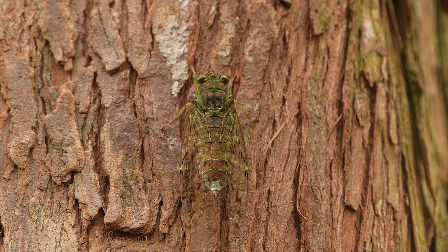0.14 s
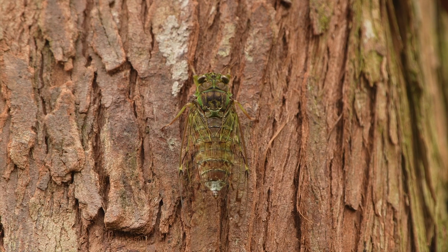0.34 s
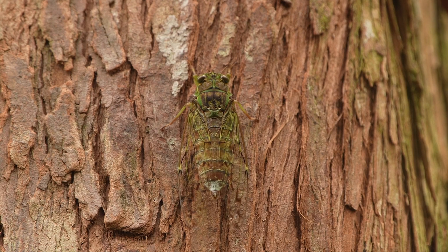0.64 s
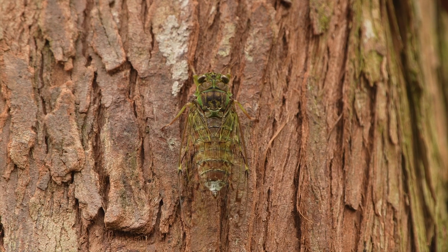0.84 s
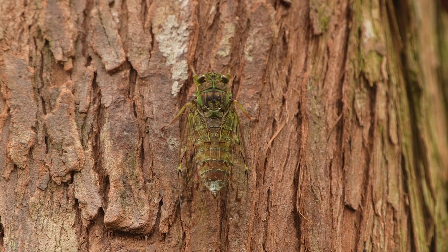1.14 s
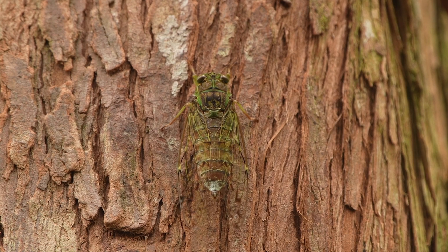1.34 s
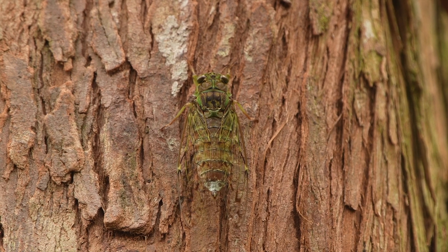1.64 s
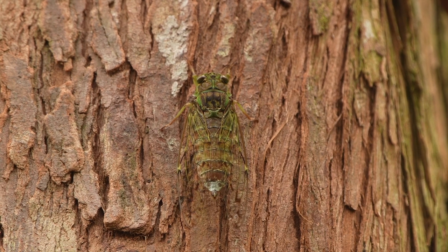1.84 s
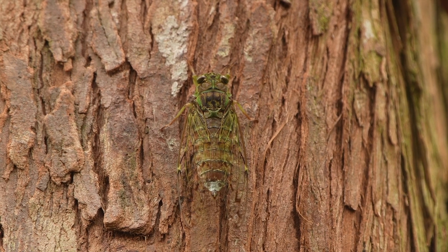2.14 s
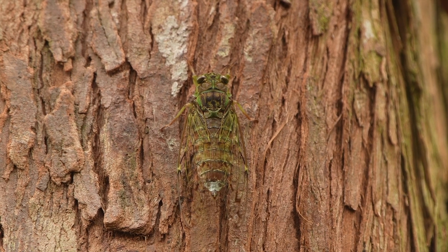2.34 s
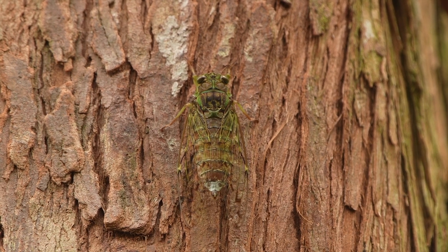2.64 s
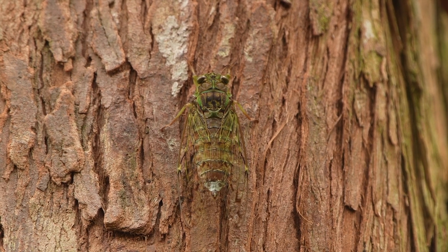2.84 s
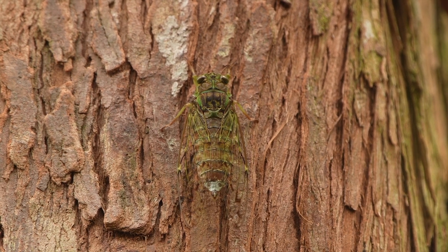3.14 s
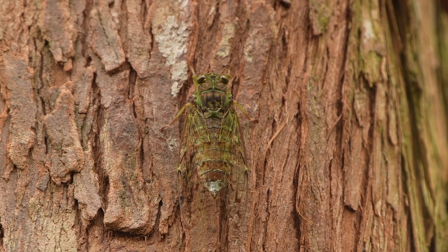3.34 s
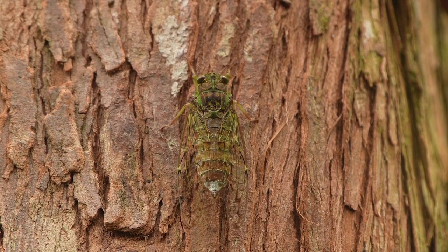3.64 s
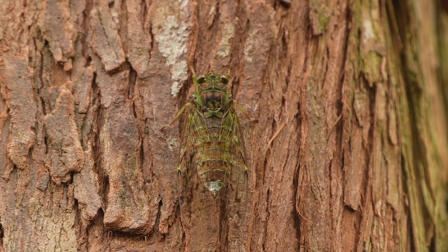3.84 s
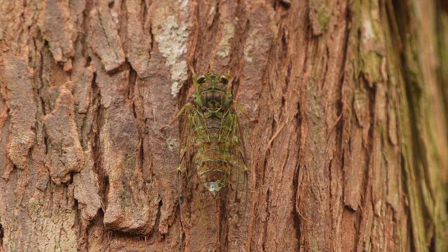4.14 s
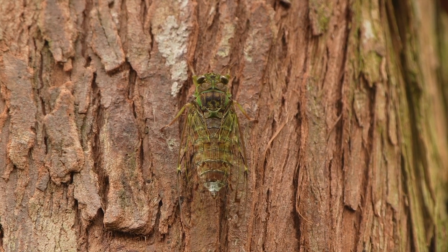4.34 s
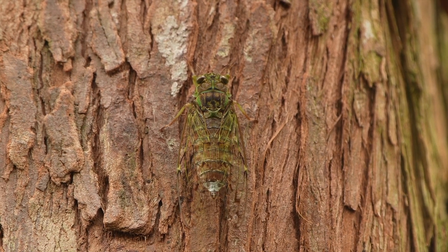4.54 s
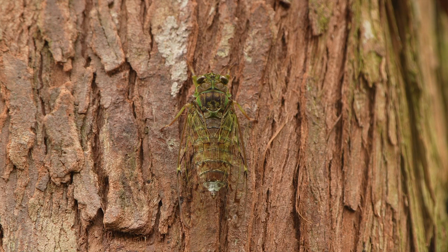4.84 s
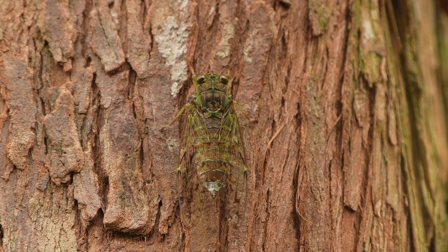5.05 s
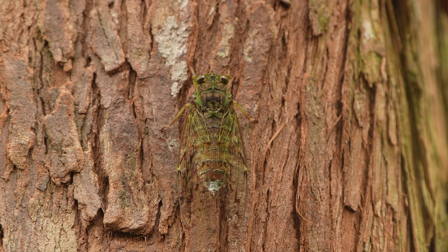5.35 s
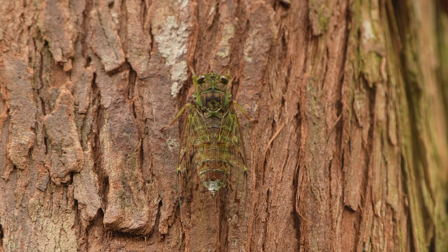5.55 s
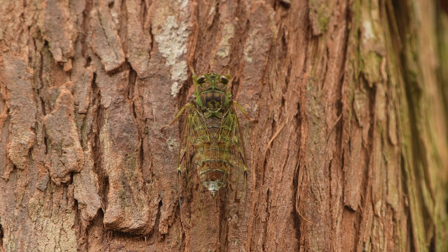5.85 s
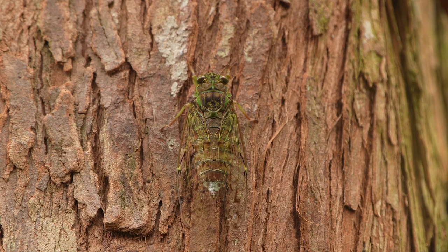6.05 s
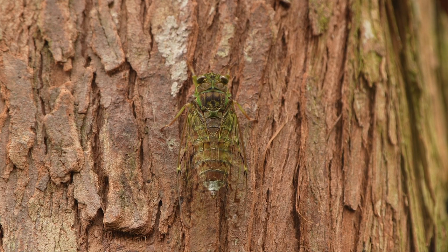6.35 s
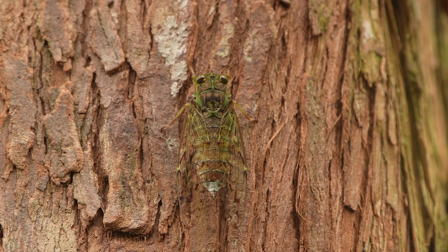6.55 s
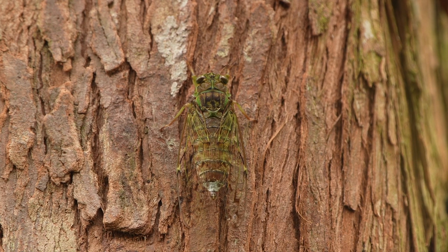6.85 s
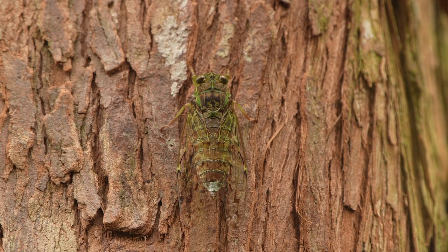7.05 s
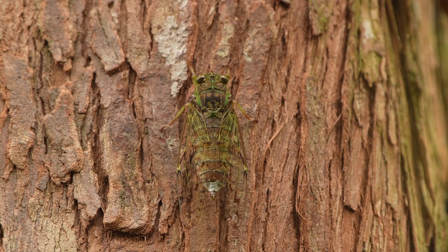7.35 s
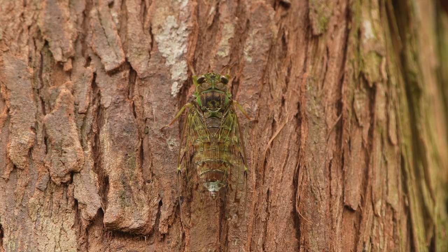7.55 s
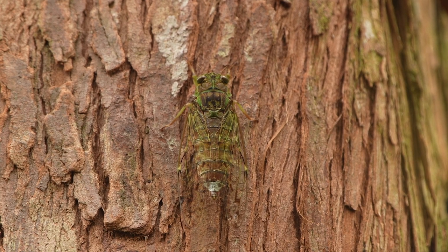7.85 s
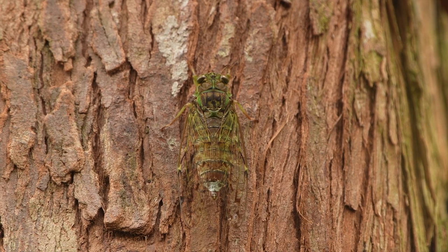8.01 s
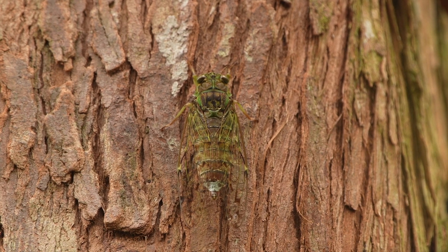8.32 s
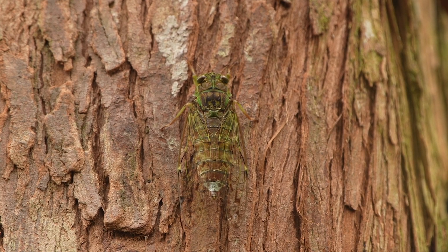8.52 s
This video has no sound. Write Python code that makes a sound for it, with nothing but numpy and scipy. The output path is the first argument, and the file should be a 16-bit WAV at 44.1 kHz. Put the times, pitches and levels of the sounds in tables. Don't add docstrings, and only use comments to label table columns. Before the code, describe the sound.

A forest outdoors, with a soft low wash of air and leaves and a faint, high shimmering chorus of distant cicadas. At 0.3 s a cicada very close to the microphone starts abruptly: a loud, dry, ringing buzz of about 160 rapid clicking strokes per second, slightly muted at first, brightening and tightening over the first half second. It holds until 1.5 s, then breaks into seven bursts of roughly a third of a second, split by tiny gaps, the last shorter and sagging in rate at 3.8-4.05 s. It then stops, dropping the level sharply. Blurred neighbours some trees away, masked until now, come through: one buzzes short phrases from 4.1 to 5.9 s with a faint clear whistle near 2.3 kHz, another dips and dies away by about 6 s. From there to 8.7 s only the thin, slowly weakening far chorus and steady low hum remain.

```python
import sys
import numpy as np
from scipy import signal
from scipy.fft import rfft, irfft
from scipy.io import wavfile
from scipy.ndimage import uniform_filter1d

SR = 44100
rng = np.random.default_rng(int(sys.argv[2]) if len(sys.argv) > 2 else 0)


def voltage_ratio(level):
    return 10 ** (np.asarray(level, float) / 20)


def pcm_store(signal):
    levels = np.round(np.clip(np.atleast_2d(signal), -1, 1) * 32767)
    wavfile.write(sys.argv[1], SR, levels.astype(np.int16).T)


N = 382788
T = np.arange(N) / SR
HZ = np.fft.rfftfreq(N, 1 / SR)

# (first stroke [s], last stroke [s], strokes after the first [count],
# change of stroke rate [share per s])
PHRASES = [
    (.3010, 1.4852, 187, .0365),
    (1.5189, 1.8394, 52, -.052),
    (1.8811, 2.2122, 53, -.058),
    (2.2535, 2.5854, 53, 0),
    (2.6354, 2.9701, 53, -.03),
    (3.0148, 3.3422, 52, -.025),
    (3.3942, 3.6987, 48, -.075),
    (3.7910, 4.0451, 39, -.3),
]
# (start [s], end [s], level [dB], clear partial [dB])
NEIGHBOUR_PHRASES = [
    (.3, 3.5, -50, -75),
    (4.071, 4.76, -49.5, -55),
    (4.82, 5.25, -48, -55),
    (5.2, 5.55, -47.5, -56.5),
    (5.61, 5.94, -47, -56),
]


def evened(x):
    return x / np.sqrt(np.mean(x ** 2) + 1e-20)


def curve(rows, t=T):
    seconds, *columns = np.transpose(rows)
    return [np.interp(t, seconds, column) for column in columns]


def drift(per_s):
    return evened(irfft(rfft(rng.standard_normal(N)) * np.exp(-(HZ / per_s) ** 2), N))


def coloured(x, points):
    hz, db = np.transpose(points)
    gain_db = np.interp(np.log(HZ + 1), np.log(hz), db)
    return evened(irfft(rfft(x) * voltage_ratio(gain_db), N))


def banded(x, bands):
    power = sum(voltage_ratio(2 * db) / (1 + (2 * (HZ - hz) / width_hz) ** 6) for hz, width_hz, db in bands)
    return evened(irfft(rfft(x) * np.sqrt(power), N))


def clicks(seconds, sizes):
    at = seconds.ravel()[:, None] * SR
    near = np.floor(at).astype(int) + np.arange(-15, 17)
    shape = np.sinc(near - at) * np.cos(np.pi * (near - at) / 32) ** 2
    pulses = shape * sizes.ravel()[:, None]
    return np.bincount(np.clip(near, 0, N - 1).ravel(), pulses.ravel(), N)


def woods(x, t60):
    taps = np.zeros(SR // 2)
    at = np.arange(200, len(taps) - 20, 20)
    taps[at + rng.integers(0, 20, len(at))] = rng.choice([-1., 1.], len(at))
    taps *= voltage_ratio(-60 * np.arange(len(taps)) / SR / t60)
    return signal.oaconvolve(x, taps / np.linalg.norm(taps))[:N]


def hum():
    # (frequency [Hz], level [dB per Hz])
    hum_colour = [(12, -32), (20, -8), (107, -2.5), (146, -2), (178, -0.5), (295, -2.5), (409, -5.5),
                  (665, -8.5), (1500, -18), (1950, -19.5), (3300, -120)]
    level_db = -55 + .5 * drift(0.36)
    return voltage_ratio(level_db) * coloured(rng.standard_normal(N), hum_colour)


def far_singers(rates_hz, colour, t60, dry, wander):
    trains = np.zeros(N)
    for rate_hz in rates_hz:
        count = np.cumsum(rate_hz * (1 + wander * drift(3.))) / SR
        at = np.interp(np.arange(1, int(count[-1])), count, T)
        uneven_s = at + 0.0002004 * rng.standard_normal(len(at))
        trains += clicks(uneven_s, voltage_ratio(0.6 * rng.standard_normal(len(at))))
    trains = evened(trains)
    blur = .75 * woods(trains, t60) + .65 * rng.standard_normal(N)
    shimmer = voltage_ratio(.7 * drift(40))
    return banded((blur + dry * trains) * shimmer, colour)


def chorus():
    # (time [s], level [dB])
    chorus_level = [
        (0, -45.5),
        (3., -43.5),
        (5.5, -49),
        (7.5, -49.5),
        (8.68, -50.5),
    ]
    # (centre [Hz], width [Hz], level [dB])
    chorus_colour = [(2194, 594, -6.5), (2850, 1700, -21), (4060, 606, -3), (4115, 170, -1.5),
                     (4515, 620, -11), (6430, 1320, -13), (8210, 810, -9.5), (9180, 560, -17),
                     (10120, 800, -19), (11800, 2200, -28), (14900, 2500, -34), (5000, 5000, -29.5),
                     (2186, 73, -2.5)]
    singers = far_singers([139.1, 151.3, 158.1, 163.4, 171.9], chorus_colour, 0.4, 0.091, .02)
    return voltage_ratio(curve(chorus_level)[0]) * singers


def phrased(levels_db, swell_db):
    swell_s, release_db_per_s = 0.16, -220
    gains = []
    for (start, end, *_), db in zip(NEIGHBOUR_PHRASES, levels_db):
        swelling_db = swell_db * np.exp(-abs(T - start) / swell_s)
        release_db = release_db_per_s * np.maximum(T - end, 0)
        gains.append((T >= start) * voltage_ratio(db + swelling_db + release_db))
    return np.max(gains, axis=0)


def neighbours():
    # (centre [Hz], width [Hz], level [dB])
    high_colour = [(2330, 350, -8), (2960, 1200, -21), (4460, 340, -2.5), (6690, 700, -6.5),
                   (8930, 1100, -7), (10900, 1300, -17), (11800, 340, -27), (12800, 900, -44),
                   (7000, 6400, -25.5)]
    # (time [s], level [dB])
    fading_level = [
        (0, -48),
        (1.5, -42),
        (4.07, -45),
        (4.9, -46.5),
        (5.2, -58),
        (5.45, -51.5),
        (6.1, -65.5),
    ]
    # (centre [Hz], width [Hz], level [dB])
    fading_colour = [(2260, 380, 0.5), (2780, 930, -15), (4310, 840, -0.5), (6500, 900, 0.5),
                     (8420, 1100, -0.5), (10100, 2300, -13), (11900, 1200, -23), (14500, 2000, -45),
                     (6000, 4600, -21.5)]
    tone_hz, tone_rise_hz_per_s = 2330, 25
    start, _, level_db, tone_db = np.transpose(NEIGHBOUR_PHRASES)
    high = phrased(level_db, -7) * far_singers([146., 161.], high_colour, 0.23, .3, .01)
    low = voltage_ratio(curve(fading_level)[0]) * far_singers([152., 168.], fading_colour, 0.38, 0.067, .015)
    phrase_start = start[np.maximum(np.searchsorted(start, T) - 1, 0)]
    hz = tone_hz + tone_rise_hz_per_s * (T - phrase_start)
    tone = np.sin(2 * np.pi * np.cumsum(hz + 3 * drift(30)) / SR) * voltage_ratio(1.5 * drift(20))
    return high + low + np.sqrt(2) * tone * phrased(tone_db, -3)


def strokes(start, end, count, climb, pause):
    cold_share, warm_s, cool_after_s, cool_s = .2, .06, .045, .03
    last_late_s = .0004
    u = np.linspace(0, end - start - last_late_s, 2000)
    cold = cold_share * np.clip((pause - cool_after_s) / cool_s, 0, 1)
    done = u + climb * u ** 2 / 2 - cold * warm_s * (1 - np.exp(-u / warm_s))
    return np.append(start + np.interp(np.arange(count), count * done / done[-1], u), end)


def song():
    skipped = [
        1.716,
        1.930,
        2.117,
        2.522,
    ]
    pauses = [1] + [after[0] - before[1] for before, after in zip(PHRASES, PHRASES[1:])]
    at = np.concatenate([strokes(*row, pause) for row, pause in zip(PHRASES, pauses)])
    return np.delete(at, np.abs(at[:, None] - skipped).argmin(0))


def effort(t):
    song_db, shy_db, shy_s, tire_db_per_s = -27.2, -2.5, 0.089, -0.02
    loose, tighten_s, tighten_bend, tire_from_s, tire_per_s = 0.65, 0.42, 1.84, 3.1, .06
    u = np.maximum(t - PHRASES[0][0], 0)
    slack = loose * np.maximum(1 - u / tighten_s, 0) ** tighten_bend
    slack = slack + tire_per_s * np.maximum(t - tire_from_s, 0)
    return song_db + shy_db * np.exp(-u / shy_s) + tire_db_per_s * u, slack


def mode(hz, width_hz, db, order=1):
    def side(centre_hz):
        return (1 + 2j * (HZ - centre_hz) / width_hz) ** -order
    return voltage_ratio(db) * (side(hz) - side(-hz)) / 1j


def spot(hz, width_hz, db):
    s, damping = 1j * HZ / hz, width_hz / hz
    return (s * s + damping * voltage_ratio(db) * s + 1) / (s * s + damping * s + 1)


def spots(rows):
    return np.prod([spot(*row) for row in rows], axis=0)


def rib_clicks():
    rib_ms = [-1.213, -.935, -.564, -.106, .361, .823, 1.278, 1.729, 2.257, 2.721]
    rib_db = [-20, -12, -3, 1.6, -.6, -3.1, -8.1, -19.4, -20.5, -22.1]
    jitter_ms, stroke_spread_db, rib_spread_db, rib_jitter_ms = .07, .35, .35, .003
    at = song()[:, None]
    chance = rng.standard_normal((len(at), 3 + 2 * len(rib_ms)))
    _, slack = effort(at)
    spacing = 1 + .11 * slack ** 2 + .003 * chance[:, 2:3]
    wander = 2.2 * uniform_filter1d(chance[:, :1], 7, axis=0)
    ms = jitter_ms * (chance[::-1, :1] + wander) + spacing * rib_ms
    ms = ms + rib_jitter_ms * (1 + slack) * chance[:, 3::2]
    rib = np.arange(len(rib_ms))
    late = np.maximum(rib - 3, .3 * (3 - rib))
    size_db = stroke_spread_db * chance[:, 1:2] + rib_db + rib_spread_db * chance[:, 4::2]
    size_db = size_db - 12 * slack * late
    return clicks(at + (ms - .25) / 1000, voltage_ratio(size_db))


def hollow_body():
    # (frequency [Hz], width [Hz], level [dB])
    moving_with = [(9240, 1560, -5.3)]
    # (frequency [Hz], width [Hz], level [dB])
    moving_against = [(2270, 230, -6), (3270, 310, -2), (3920, 220, -6.8), (4320, 560, -4.9),
                      (5880, 1160, -.8), (8530, 520, -1.7)]
    # (frequency [Hz], width [Hz], gain [dB])
    dips_and_lifts = [(1330, 680, -10), (1865, 280, -5), (2120, 720, 3), (2754, 146, 6.5), (5280, 1350, -6),
                      (15100, 1300, -6)]
    # (delay [ms], level [dB])
    bark = [
        (2.898, -23),
        (3.699, -65),
        (4.599, -17),
    ]
    body = sum(mode(*row) for row in moving_with) - sum(mode(*row) for row in moving_against)
    body = body + mode(10660, 7800, -20.5, order=2)
    s = 1j * HZ / 1220
    body *= (s * s / (s * s + np.sqrt(2) * s + 1)) ** 3
    body *= spots(dips_and_lifts)
    return body * (1 + sum(voltage_ratio(db) * np.exp(-2j * np.pi * HZ * ms / 1000) for ms, db in bark))


def cicada():
    # (frequency [Hz], width [Hz], gain [dB])
    slack_spots = [(9400, 1900, -31), (11600, 11000, -28), (4530, 900, -23), (3160, 920, 2.5)]
    swelling_db, swelling_s = 7, .5
    ringing = rfft(rib_clicks()) * hollow_body()
    level_db, slack = effort(T)
    early = np.exp(-abs(T - PHRASES[0][0]) / swelling_s)
    small = spot(3000, 350, swelling_db) / spot(2780, 230, swelling_db)
    taut = (1 - early) * irfft(ringing, N) + early * irfft(ringing * small, N)
    dull = irfft(ringing * spots(slack_spots), N)
    share = np.clip(slack, 0, 1)
    return voltage_ratio(level_db - 3.0) * ((1 - share) * taut + share * dull) / taut.std()


def scene():
    near = cicada()
    tail = voltage_ratio(-16) * signal.lfilter([.5], [1, -.5], woods(near, .05))
    return (near + tail + neighbours() + chorus() + hum())[None]


def top_cut(x):
    return signal.sosfilt(signal.butter(12, 16500, fs=SR, output="sos"), x)


def record(dry):
    edge = signal.firwin(1023, 15870, window=("kaiser", 8), fs=SR)
    mix = signal.oaconvolve(dry, edge[None], "same")
    return top_cut(mix)


dry = scene()
out = record(dry)
pcm_store(out)
```